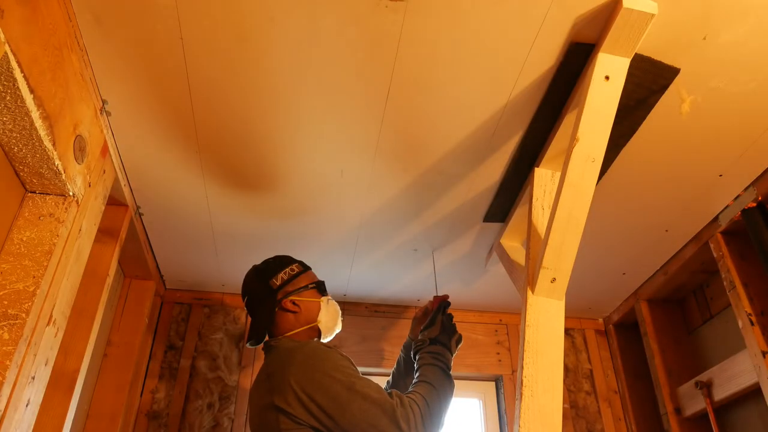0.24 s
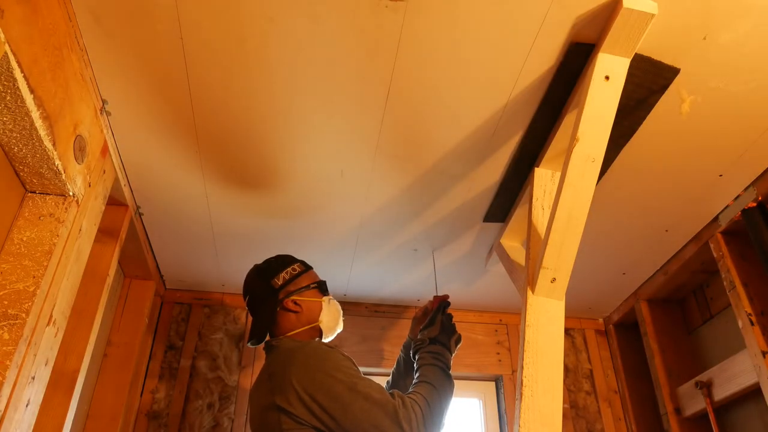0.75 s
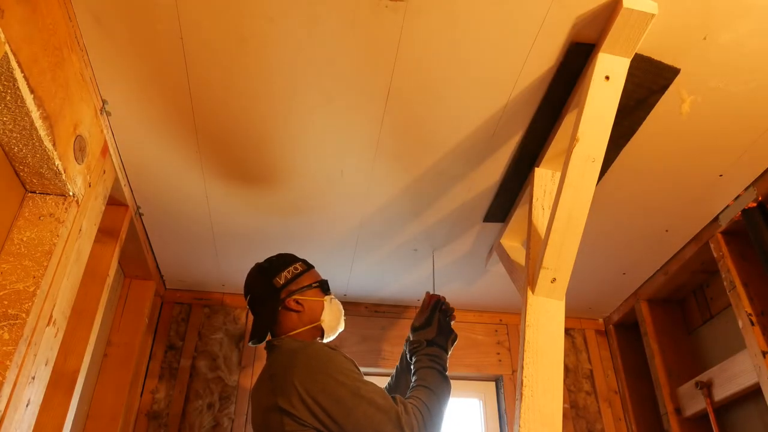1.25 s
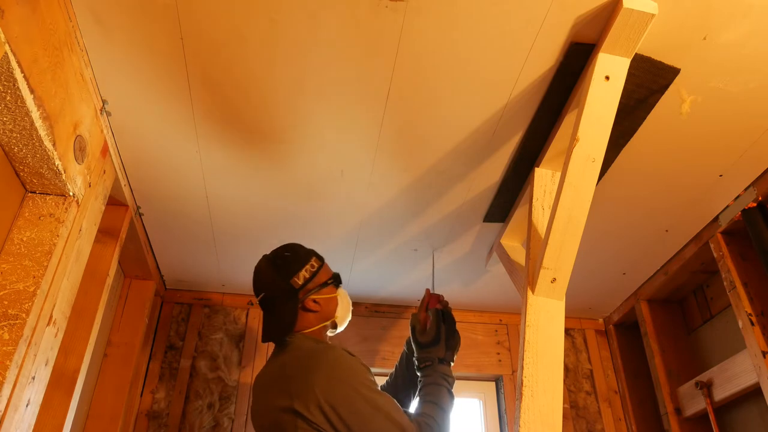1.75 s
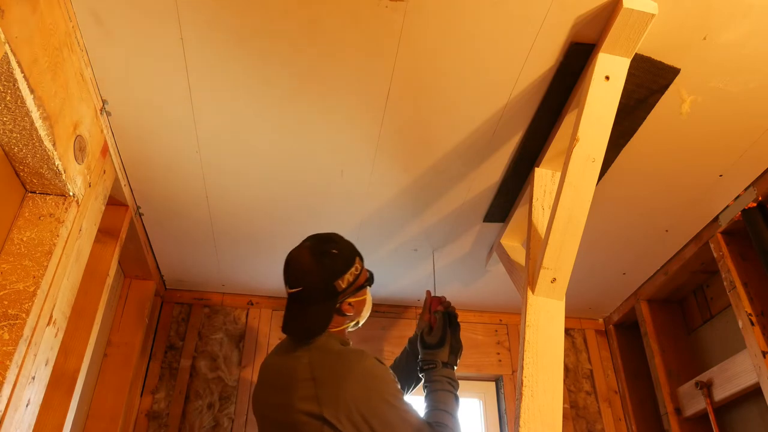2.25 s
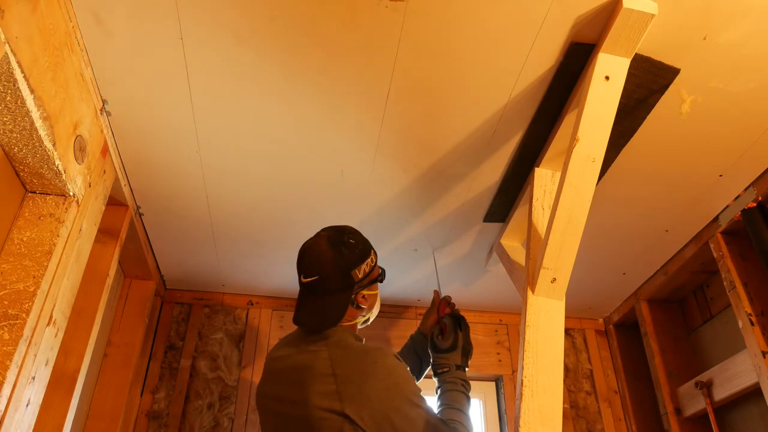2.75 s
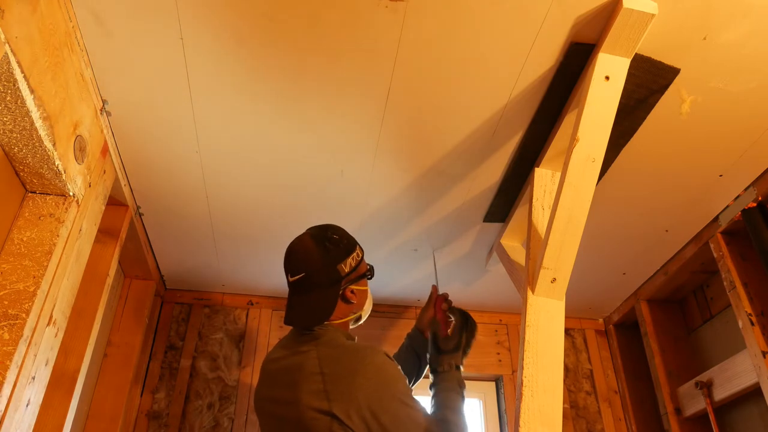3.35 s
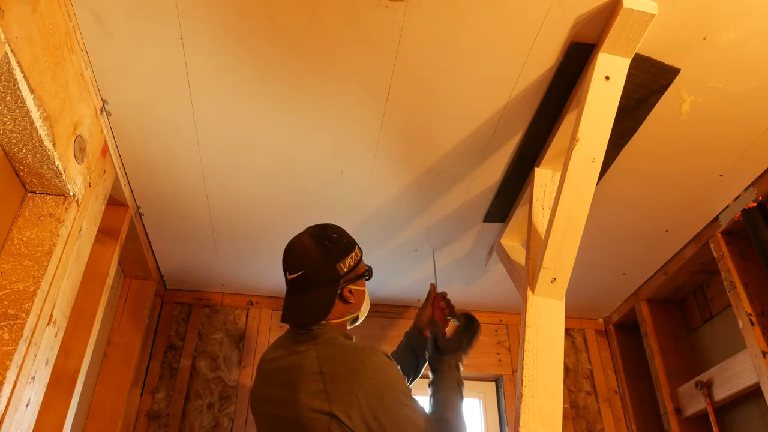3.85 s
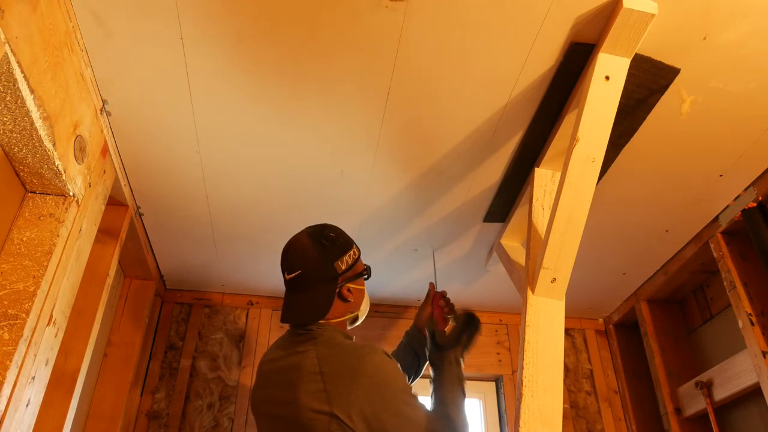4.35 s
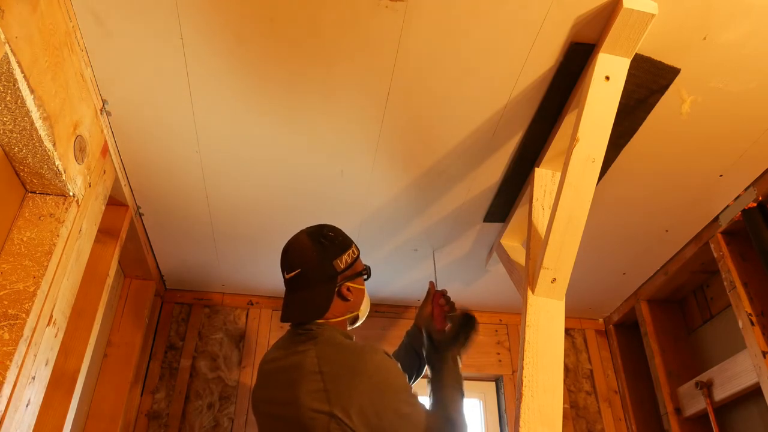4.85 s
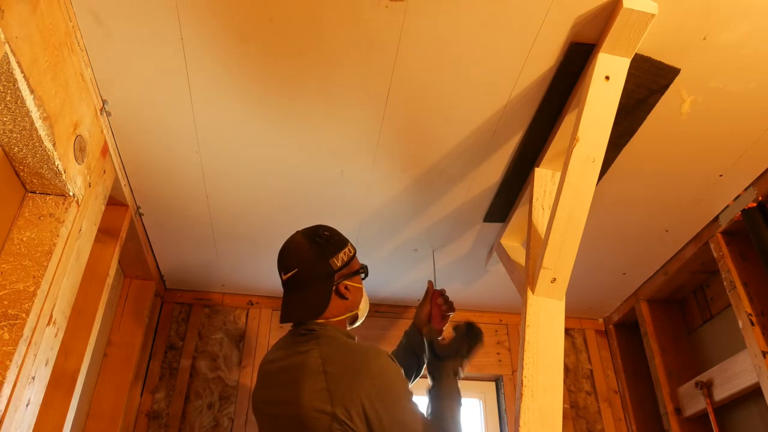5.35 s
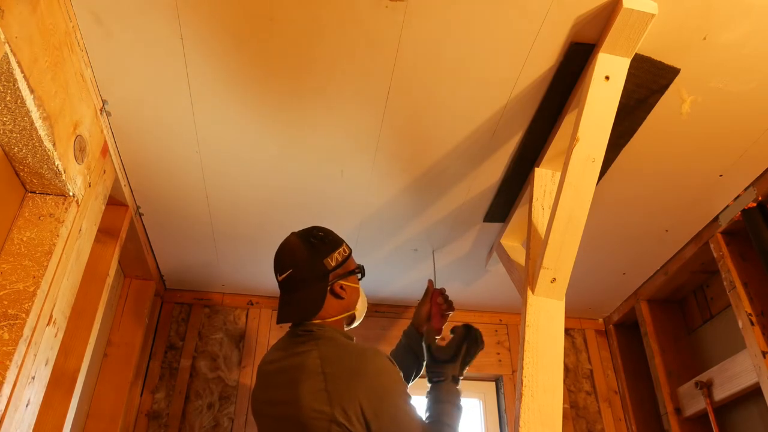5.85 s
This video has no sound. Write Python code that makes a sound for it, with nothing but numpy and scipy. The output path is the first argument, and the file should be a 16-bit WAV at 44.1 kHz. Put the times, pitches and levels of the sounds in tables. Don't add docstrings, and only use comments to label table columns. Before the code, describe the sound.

Soft footsteps and ladder clicks over steady hiss, then a hand saw jabs up into a plasterboard ceiling, crunching and booming harder with each stroke.

```python
import sys
import numpy as np
from scipy import signal
from scipy.fft import rfft, irfft
from scipy.io import wavfile
from scipy.ndimage import uniform_filter1d

SR = 44100
rng = np.random.default_rng(int(sys.argv[2]) if len(sys.argv) > 2 else 0)


def generate_wav(signal):
    frames = np.transpose(np.atleast_2d(signal))
    scaled = np.clip(frames, -1, 1) * 32767
    pcm = np.round(scaled).astype(np.int16)
    wavfile.write(sys.argv[1], SR, pcm)


def to_linear_factor(level_db):
    exponent = np.asarray(level_db, float) / 20
    return 10 ** exponent


N = 268585
TAIL = np.arange(SR // 2) / SR

# pitch_hz, level_db (per Hz)
HISS = [(20, -22), (60, -6), (160, 0), (300, -2), (600, -7), (1000, -7), (1400, -10), (2000, -15),
        (4000, -19), (10000, -20), (16000, -24)]
# pitch_hz, level_db (per Hz)
HISS_SIDE = [(15, -61), (25, -41), (102, -8), (134, -8), (256, -3.5), (285, -6), (344, -6.5), (1040, -14),
             (3160, -28.5), (14000, -41), (16000, -26)]
# pitch_hz, level_db
MICROPHONE = [(15, -24), (35, 0), (7300, 0), (7900, -7), (8500, 0), (15300, 0), (15900, -40)]
# pitch_hz, t60_s (time to fall 60 dB), level_db, side_db
ROOM = [(62, 0.83, 1, -22), (133, 0.49, 5, -30), (231, 0.21, 5.5, -18), (453, 0.34, 4, -9.5),
        (1106, 0.3, 3.5, -5.5), (1840, 0.29, 0.5, -3.5), (3750, 0.29, -2.5, -4), (7800, 0.18, 4.5, -11),
        (11800, 0.069, 6, -1.5)]
# start_s, effort_db
SHUFFLE = [(0.0, -79), (0.81, -114), (1.03, -75.5), (1.66, -61), (2.26, -61), (2.47, -72), (2.75, -69.5),
           (3.09, -59.5), (3.21, -57), (3.44, -69), (6.09, -118)]
# pitch_hz, level_db (per Hz)
BOARDS = [(18, -41), (30, -27), (70, -3.5), (102, 0), (146, -3), (429, 3.5), (668, -11), (792, 1),
          (900, -56), (1170, -14), (1980, -120)]
# pitch_hz, level_db (per Hz)
CLOTH = [(500, -30), (1000, -1), (2500, 0), (4500, -4), (7000, -7), (10000, -6), (15500, -17)]
# start_s, level_db, pitch_hz
KNOCKS = [
    (0.0, -55, 285),
    (0.806, -60, 157),
    (1.095, -56.5, 273),
    (1.142, -58, 145),
    (1.522, -53, 256),
    (1.627, -53, 154),
    (2.05, -54, 255),
    (2.345, -45, 244),
    (2.824, -57, 137),
    (2.897, -43, 148.5),
]
# start_s, level_db, body_db, metal_db
CLICKS = [
    (0.873, -35, -46.5, -8.5),
    (0.962, -48, -57, 0),
    (1.4636, -41.5, -56.5, -12),
    (2.1212, -43.5, -66, -3),
    (2.8667, -32, -52.5, -7.5),
]
# pitch_hz, level_db, t60_s
LADDER_METAL = [(920, -4, .04), (1800, -6, .03), (2750, 2, .05), (2900, -3, .04), (4780, -3, .05),
                (5010, -1, .045), (7040, 0, .05), (8800, -2, .02), (9450, -1, .02), (10400, -4, .02),
                (11600, 0, .02), (12300, -2, .02)]
# start_s (of the middle), length_s, pitch_hz, level_db
BRUSHES = [(1.31, .04, 2000, -58), (1.37, .04, 2400, -56), (1.557, .006, 2500, -58),
           (2.455, .006, 2600, -55), (2.68, .025, 2600, -54), (2.78, .02, 3200, -58), (3.2, .02, 750, -50),
           (3.258, .02, 900, -50), (3.26, .02, 2200, -58), (3.615, .012, 1300, -52),
           (5.38, .012, 1650, -40), (5.645, .012, 1650, -39)]
# start_s (thrust lands), lead_s (tip touches this much earlier), crunch_db, boom_db, teeth_db
THRUSTS = [(2.69, 0.03, -43, -88, -2), (3.096, 0.031, -36.5, -84, 4.5), (3.413, .043, -34, -47, 6),
           (3.648, .023, -22.5, -75, -0.5), (3.905, .03, -22, -43, 0), (4.153, 0.026, -20, -31, -5),
           (4.399, 0.028, -18.5, -26.5, -0.5), (4.646, .025, -16.5, -25, -11),
           (4.892, .025, -13, -23.5, -34), (5.151, 0.021, -8, -18.5, -13), (5.415, 0.018, -8.5, -17, -10.5),
           (5.677, 0.012, -10, -16, -9), (5.956, 0.018, -7, -15.5, -6.5)]
# pitch_hz, level_db (per Hz)
GYPSUM = [(120, -90), (200, 5), (387, -4.5), (805, 0), (1100, -8.5), (1450, -7.5), (2010, -10),
          (2800, -15.5), (4120, -17.5), (8110, -28.5), (9740, -28.5), (14100, -46), (16000, -75)]
# pitch_hz, level_db, t60_s
SHEET = [(38, -27, .5), (49, -18, .5), (62, -15, .25), (75, -2, .25), (98, -5, .2), (118, 1, .25),
         (136, -1, .18), (152, 4, .16), (168, -3, .15)]
# pitch_hz, level_db, t60_s
PATCH = [(150, 1, .13), (183, -5, .13), (221, -3, .15), (250, -3, .14), (290, -5, .12), (330, -7, .12),
         (400, -4, .12), (470, -7, .12), (592, -14, .13), (735, -11, .13), (800, -7, .1), (900, -7, .1),
         (1001, -1, .12), (1155, -9, .1)]
# pitch_hz, level_db, t60_s
BLADE = [(301, -5, .6), (735, -6, .3), (1333, 0, .3), (1343, -7, .25), (1322, -9, .2), (1300, -5, .08),
         (1464, -4, .08), (1658, -7, .22)]
# pitch_hz, level_db, t60_s
TEETH = [(2050, -8, .007), (2520, 0, .007), (3150, 0, .007), (4700, -9, .01)]

FIRM_DB, FIRM_BOOM_DB = -21, -24


def unit(x):
    return x / np.sqrt(np.mean(x ** 2))


def peak(x):
    return x / np.abs(x).max()


def energy(x):
    return 8 * x / np.sqrt(np.sum(x ** 2))


def colour(spectrum):
    hz, db = np.transpose(spectrum)
    bins = np.maximum(np.fft.rfftfreq(2048, 1 / SR), 1)
    level = to_linear_factor(np.interp(np.log(bins), np.log(hz), db))
    cepstrum = irfft(np.log(level))
    cepstrum[1:1024] *= 2
    cepstrum[1025:] = 0
    return irfft(np.exp(rfft(cepstrum)))


def through(x, response):
    return signal.fftconvolve(x, response)[:len(x)]


def fade(t60):
    return np.exp(-np.log(1000) * TAIL / t60)


def ring(modes, scatter_db):
    out = np.zeros(len(TAIL))
    for hz, db, t60 in modes:
        level = to_linear_factor(db + scatter_db * rng.standard_normal())
        out += level * fade(t60) * np.sin(2 * np.pi * hz * TAIL)
    return out


def grit(rate, spread_db, size):
    chance = rng.random((3, size))
    happens = chance[0] < rate / SR
    return unit(happens * (chance[1] - .5) * to_linear_factor(-spread_db * np.log(chance[2])))


def push(length_s):
    return np.sin(np.pi * np.clip(TAIL / length_s, 0, 1))


def flicker(rate, depth_db):
    hold = int(SR / rate)
    steps = np.repeat(rng.standard_normal(N // hold + 1), hold)
    return to_linear_factor(depth_db * uniform_filter1d(steps, hold)[:N])


def noise(spectrum, side_spectrum, side_db):
    mid = unit(through(rng.standard_normal(N), colour(spectrum)))
    side = unit(through(rng.standard_normal(N), colour(side_spectrum)))
    return mid + to_linear_factor(side_db) * side * np.array([[1], [-1]])


def add(out, s, x):
    i = int(s * SR)
    out[i:i + len(x)] += x[:N - i]


def hiss():
    return to_linear_factor(-67.5) * noise(HISS, HISS_SIDE, 7.6)


def room(x):
    mid, side = np.zeros((2, len(TAIL)))
    for hz, t60, db, side_db in ROOM:
        sos = signal.butter(2, [hz / 1.41, hz * 1.41], "band", fs=SR, output="sos")
        band = signal.sosfilt(sos, rng.standard_normal((2, len(TAIL))))
        band = band * to_linear_factor(db) * fade(t60) / np.sqrt(t60)
        mid = mid + band[0]
        side = side + to_linear_factor(side_db) * band[1]
    onset = np.clip(TAIL / 0.00093, 0, 1) * to_linear_factor(-3) / np.sqrt(np.sum(mid ** 2))
    wide = through(x, onset * side) + to_linear_factor(-14.5) * np.roll(x, 150)
    return x + through(x, onset * mid) + wide * np.array([[1], [-1]])


def shuffle():
    recoil_after_s, recoil_s, recoil_db, recoil_slope = 0.11, 0.079, -54, 0.72
    cloth_db, cloth_slope, still_db = -67, .3, -67.5
    t = np.arange(N) / SR
    effort_db = np.interp(t, *np.transpose(SHUFFLE))
    recoil = np.zeros(N)
    for s, _, _, boom_db, _ in THRUSTS:
        level = to_linear_factor(recoil_db + recoil_slope * (boom_db - FIRM_BOOM_DB))
        recoil += level * np.exp(-np.abs(t - s - recoil_after_s) / recoil_s)
    weight = (to_linear_factor(effort_db) + recoil) * to_linear_factor(-1.5) * flicker(25, 3.)
    boards = weight * noise(BOARDS, BOARDS, -2.5)
    cloth = to_linear_factor(cloth_db + cloth_slope * (effort_db - still_db)) * noise(CLOTH, CLOTH, -7.5)
    return boards + cloth


def knocks():
    out = np.zeros(N)
    for s, db, hz in KNOCKS:
        rough = uniform_filter1d(rng.standard_normal(len(TAIL)), size=40)
        force = np.diff(rough * push(0.016) ** 2, prepend=0)
        timber = ring([(hz, 0, .12), (1.55 * hz, -5, .08)], 0)
        add(out, s, to_linear_factor(db + 2.5) * peak(through(force, timber)))
    return out


def ladder():
    out = np.zeros(N)
    for s, db, body_db, metal_db in CLICKS:
        rattle = grit(12000, 2., len(TAIL)) * fade(.11) * np.clip(TAIL / .003, 0, 1)
        bright = colour([(300, -25), (1200, 19), (5000, 24), (12000, 24.5), (16000, 25.5)])
        snap = peak(through(rattle, bright))
        metal = peak(through(rattle, ring(LADDER_METAL, 0.53)))
        add(out, s, to_linear_factor(db + 5) * (snap + to_linear_factor(metal_db) * metal))
        body = ring([(237.6, 3, 0.13), (281.0, -3.0, 0.18), (368, 8.5, 0.07)], 3.3)
        body = body * np.clip(TAIL / 0.0033, 0, 1)
        add(out, s - .006, to_linear_factor(body_db + 6.0) * peak(body))
    return out


def brushes():
    out = np.zeros(N)
    for s, length_s, hz, db in BRUSHES:
        rub = grit(7900, 0.24, len(TAIL)) * push(2 * length_s) ** 2
        board = ring([(hz, 0, .006), (0.833 * hz, -2, .01), (1.2 * hz, -4, .004)], 0)
        add(out, s - length_s, to_linear_factor(db) * peak(through(rub, board)))
    return out


def tugs():
    tug_db, tug_slope = -39, 1.07
    rasp_db, rasp_slope = -40, .9
    sing_db, sing_slope = -46, .9
    out = np.zeros(N)
    for thrust_s, _, _, boom_db, _ in THRUSTS:
        s = thrust_s + 0.083
        deep = boom_db - FIRM_BOOM_DB
        drag = grit(5300, 0.65, len(TAIL)) * push(0.057) ** 2
        board = peak(through(drag, ring(SHEET[3:] + PATCH, 2.5)))
        add(out, s - .035, to_linear_factor(tug_db + tug_slope * deep) * board)
        rasp = energy(through(drag, colour(GYPSUM)))
        add(out, s - .06, to_linear_factor(rasp_db + rasp_slope * deep) * rasp)
        bend = np.sin(2 * np.pi * 1335 * TAIL) + 0.5 * np.sin(2 * np.pi * 301 * TAIL)
        shiver = push(0.04) * bend + 0.3 * drag
        song = peak(through(shiver, ring(BLADE, 1.5)))
        add(out, s - .03, to_linear_factor(sing_db + sing_slope * deep) * song)
    return out


def scrape(lead_s, hz, gypsum):
    pressure = 2.5 * fade(.03) + .5 * np.exp(-np.maximum(TAIL - lead_s, 0) / .004)
    skid = grit(8000, 1.5, len(TAIL)) * pressure
    tip = through(skid, ring([(hz, 0, .012), (1.22 * hz, -4, .01)], 0))
    powder = through(skid, gypsum)
    paper = np.diff(powder, prepend=0) + .15 * powder
    return energy(energy(tip) + to_linear_factor(-4) * energy(paper))


def crunch(lead_s, hard_db, teeth_db, gypsum):
    rise_s, hold_s, crumble_s, teeth_s = 0.0055, 0.0042, 0.015, 0.0086
    dust_s, dust_db = 0.3, -25.5
    t = TAIL - lead_s
    quick = to_linear_factor(0.09 * hard_db)
    cracks = grit(9000, 1.9, len(t)) * flicker(160, 4.)[:len(t)]

    def bite(fall_s):
        falling = np.exp(-np.maximum(t - hold_s, 0) * quick / fall_s)
        return cracks * np.where(t < 0, np.exp(t / rise_s), falling)

    dust = cracks * to_linear_factor(dust_db) * (t > 0) * np.exp(-t / dust_s)
    crumbs = energy(through(bite(crumble_s) + dust, gypsum))
    teeth = energy(through(bite(teeth_s), ring(TEETH, 2.5)))
    return crumbs + to_linear_factor(teeth_db) * teeth


def jabs():
    touch_db, touch_slope = -39, 0.58
    knock_db, slope_soft, slope_hard = -25, 1.6, 0.11
    yield_s, yield_slope = 0.00695, -0.000494
    yield_hz, yield_hz_per_db = 419, 27
    out = np.zeros(N)
    gypsum = colour(GYPSUM)
    for s, lead_s, crunch_db, boom_db, teeth_db in THRUSTS:
        hard = crunch_db - FIRM_DB
        touch_s = s - lead_s
        tip_hz = 1300 * (1 + .06 * rng.standard_normal())
        add(out, touch_s, to_linear_factor(touch_db + touch_slope * hard) * scrape(lead_s, tip_hz, gypsum))
        add(out, touch_s, to_linear_factor(crunch_db - 5) * crunch(lead_s, hard, teeth_db, gypsum))

        give_s = s + max(yield_s + yield_slope * hard, 0)
        knock_hz = max(yield_hz + yield_hz_per_db * max(hard, 0), 100)
        level_db = knock_db + min(slope_soft * hard, slope_hard * hard)
        crackle = to_linear_factor(-55) * grit(3000, 3.6, len(TAIL)) * fade(0.067)
        force = np.diff(push(.0025), prepend=0) + crackle
        knock = through(force, ring(PATCH + [(knock_hz, 5, .06)], 2.))
        add(out, give_s, to_linear_factor(level_db + 3) * peak(knock))
        boom = through(np.diff(push(.007), prepend=0), ring(SHEET, 1.5))
        add(out, give_s, to_linear_factor(boom_db + 4.0) * peak(boom))
    return out


def scene():
    near = jabs() + tugs() + brushes() + ladder() + knocks()
    return room(near) + shuffle() + hiss()


def band_limit(x):
    return signal.sosfilt(signal.butter(12, 16130, fs=SR, output="sos"), x)


def record(dry):
    heard = np.array([through(channel, colour(MICROPHONE)) for channel in dry])
    return band_limit(heard)


dry = scene()
out = record(dry)
generate_wav(out)
```